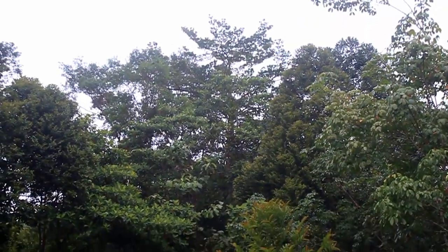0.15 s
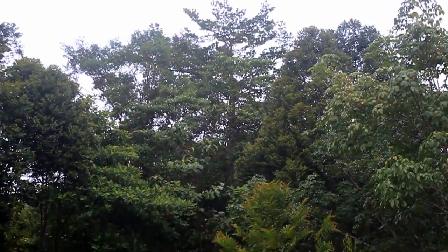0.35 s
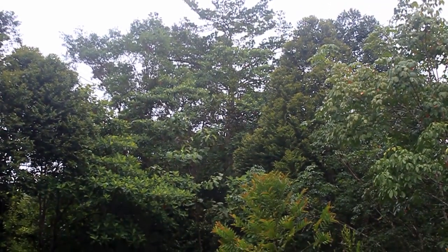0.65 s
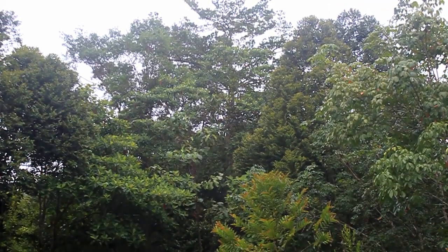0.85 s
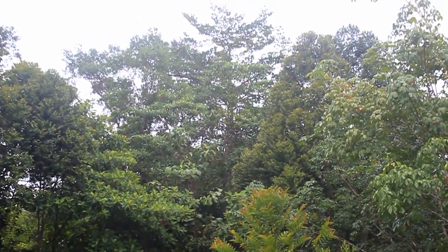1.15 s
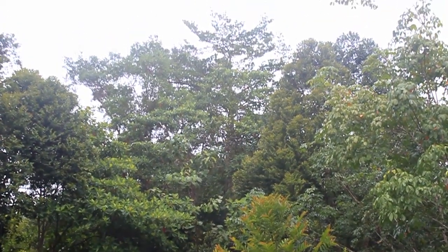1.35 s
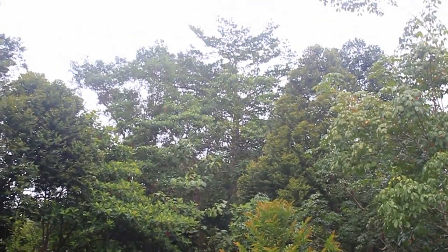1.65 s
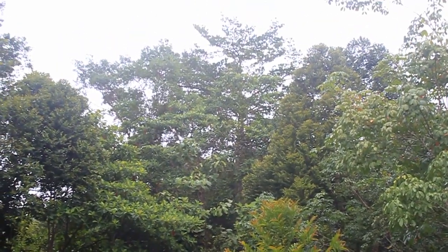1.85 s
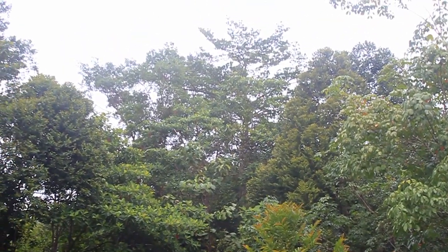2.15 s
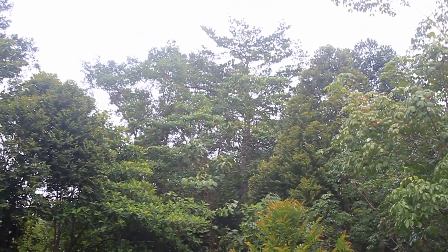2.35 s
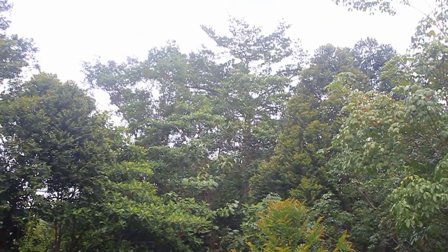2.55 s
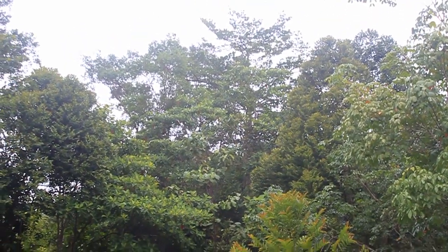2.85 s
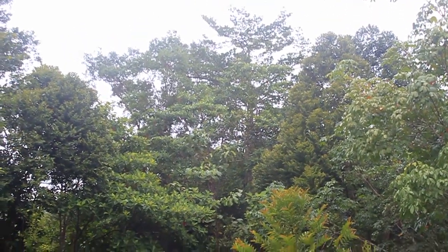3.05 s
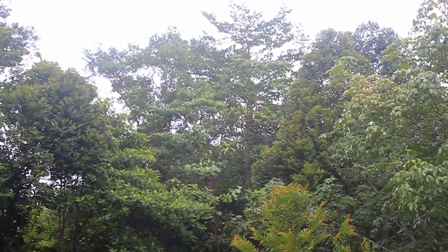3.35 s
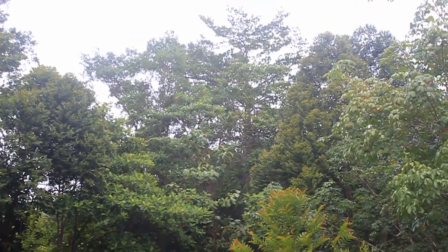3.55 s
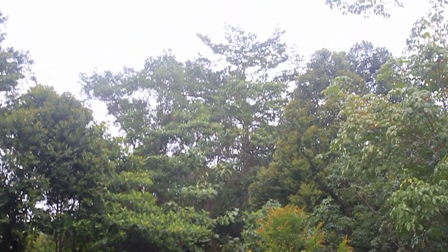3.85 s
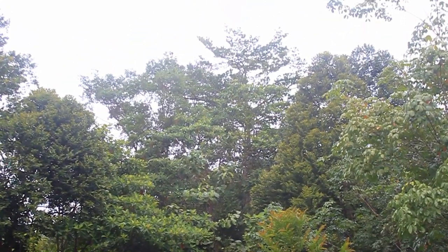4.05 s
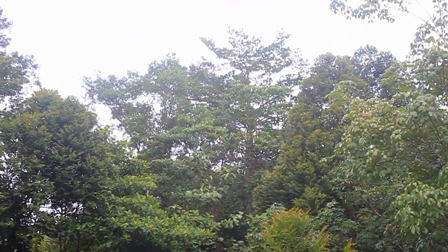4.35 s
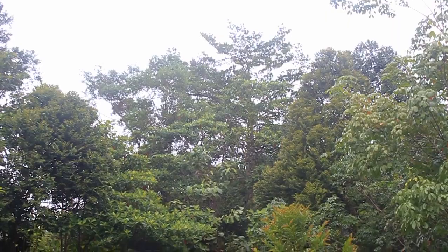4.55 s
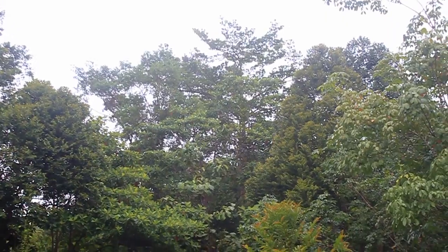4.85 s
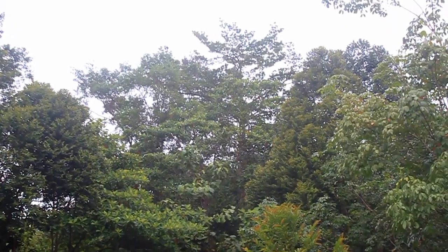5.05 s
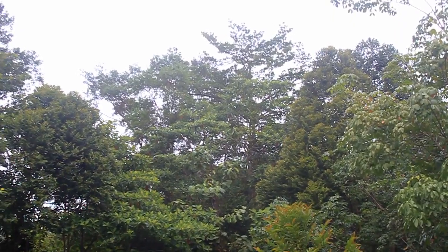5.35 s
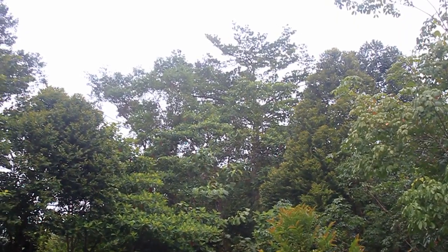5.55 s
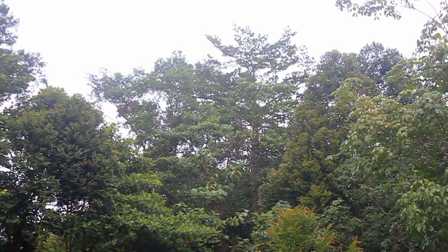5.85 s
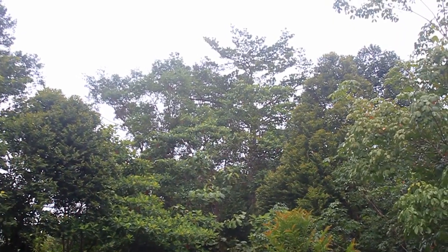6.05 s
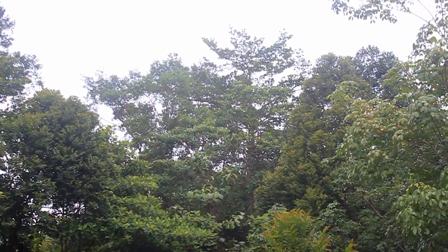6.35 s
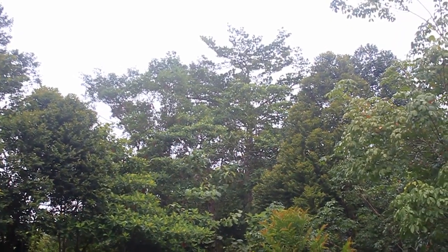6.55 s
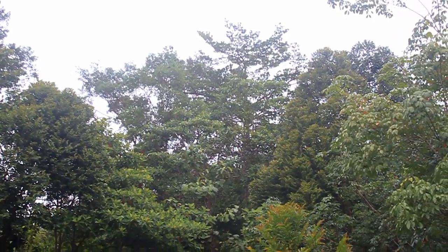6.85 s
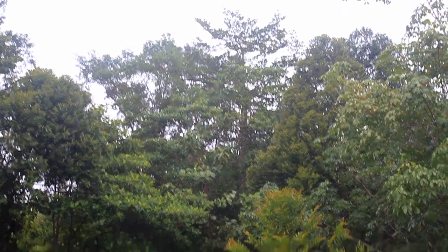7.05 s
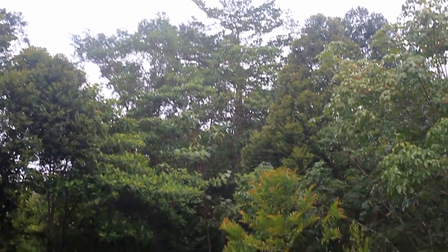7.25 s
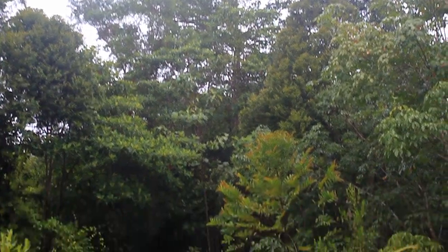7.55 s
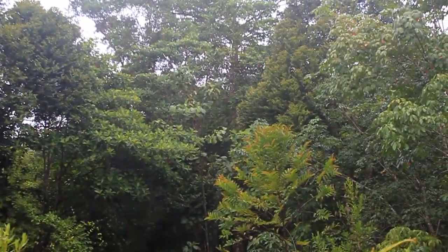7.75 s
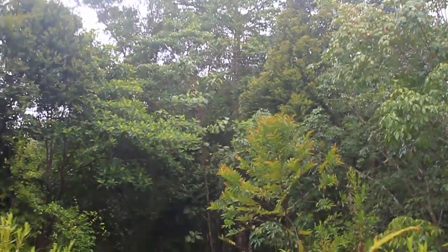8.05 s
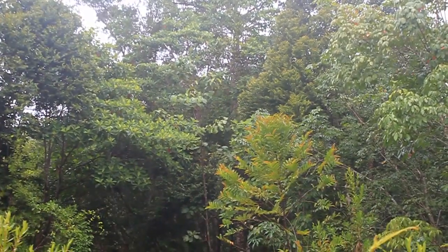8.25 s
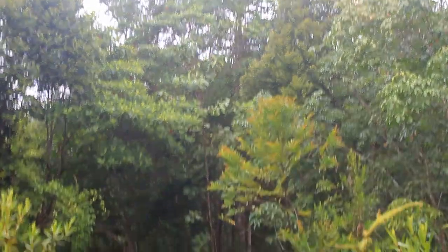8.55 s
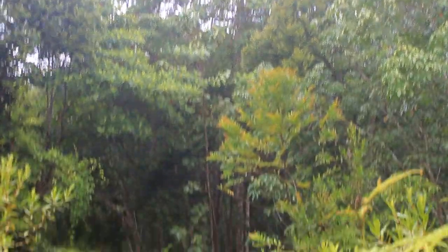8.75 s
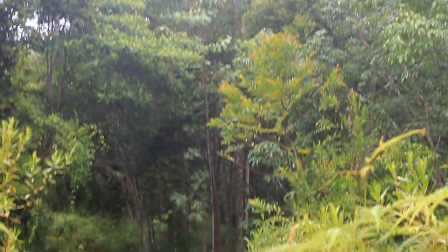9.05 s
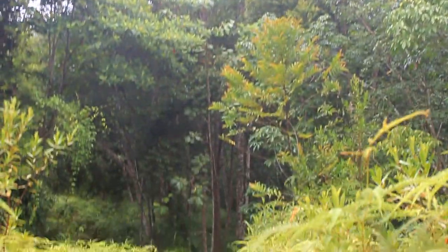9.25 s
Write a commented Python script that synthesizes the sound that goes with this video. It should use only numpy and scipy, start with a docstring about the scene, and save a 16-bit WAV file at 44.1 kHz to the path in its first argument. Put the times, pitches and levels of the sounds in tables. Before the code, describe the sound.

A rainforest hisses softly with distant leaves, while a cicada throbs, bush crickets trill in high swells and far insects drone throughout. Distant gibbons are much the loudest sound: clear hoots that slide quickly upward, hold, and trail off in a long forest echo. Overlapping whoops come in the first second, again from about 2.4 to 3.4 seconds and from 5.9 to 6.5 seconds, with a single last one at 9.4. A quieter bird whistles two thin, sagging notes from 1.6 to 2.7 seconds and repeats them from 8.5 seconds to the end. Another bird chirps faintly around 4 and 9 seconds. The cicada drops away briefly near 1.4 seconds, then builds back. Close to the microphone, soft woody taps and tiny bright ticks are scattered through, with one small, sharp knock at about 2.1 seconds.

```python
"""Gibbons in a rainforest.

Distant gibbons whoop in overlapping notes; trunks and leaves scatter each into a long tail.
One bird whistles two sagging notes, twice; another chirps faintly. A cicada's tymbals throb,
bush crickets trill above it, far insects drone and foliage hisses softly.
Close by: soft woody taps, and small ticks and one knock that ring a camera body."""
import sys
import numpy as np
from scipy import signal
from scipy.fft import rfft, irfft, next_fast_len
from scipy.io import wavfile

SR = 44100
rng = np.random.default_rng(int(sys.argv[2]) if len(sys.argv) > 2 else 0)


def waveform_to_disk(signal):
    """Save audio, clipped to [-1, 1], as 16-bit WAV at the path in sys.argv[1]."""
    frames = np.transpose(np.atleast_2d(signal))
    scaled = np.clip(frames, -1, 1) * 32767
    samples = np.round(scaled).astype(np.int16)
    wavfile.write(sys.argv[1], SR, samples)


N = 414981
TIME = np.arange(N) / SR

# forest echo decay: freq_hz, t60_s
ECHO_DECAY = [(400, 2.14), (770, 2.18), (1150, 1.69), (2300, 1.28), (4000, 1.08), (9000, 1.2)]
# far foliage spectrum: freq_hz, gain_db
FOLIAGE_SPECTRUM = [(20, -23), (50, -8), (100, -3), (160, 4), (220, 1.5), (450, 2.5), (1000, 4),
                    (2000, 3.5), (4000, 0.5), (6000, -4), (9000, -5.5), (11500, -8), (16000, -5)]
# far insect choruses: centre_hz, width_hz, level_db
CHORUS_BANDS = [(5530, 620, -65.5), (6570, 570, -69), (7330, 1300, -67)]
# thin insect buzz: peak_s, half_width_s, peak_db
BUZZ_SWELLS = [(.7, 1.9, -65), (2.8, 1.4, -63), (4.6, .9, -67.5), (6.45, 0.54, -62.5), (7.18, 0.093, -67),
               (8.08, .14, -67), (8.98, 0.19, -62), (9.35, .2, -70)]
# bush cricket bouts: start_s, length_s, peak_db, swell_db, release_s
CRICKET_BOUTS = [(0, .89, -56.5, 17, .05), (.95, .69, -64, 1.5, .06), (2.048, 1.83, -56.5, 19, 0.11),
                 (3.992, .83, -58.5, 8, .4), (5.25, 0.75, -60, 9, .15), (6.008, 1.03, -57, 7.5, 0.016),
                 (7.3, 1.22, -59, 13, 0.045), (8.6, .85, -55.5, 13, .05)]
# bush cricket spectrum: freq_hz, gain_db
CRICKET_SPECTRUM = [(9000, -20), (11700, -4), (12400, -2), (13500, 1), (15300, 5), (16500, -5.5)]
# cicada rhythm: time_s, throbs_completed
CICADA_THROBS = [(0, .15), (.79, 5), (2.41, 16), (2.935, 20), (3.505, 24), (4.378, 30), (5.727, 39),
                 (9.537, 64)]
# cicada effort: time_s, gain_db
CICADA_EFFORT = [(0, -59.5), (.72, -56.5), (.83, -69), (1.3, -64), (1.42, -88), (2.2, -69.5), (2.7, -62.5),
                 (3.7, -56), (8.3, -54.5), (9.4, -52)]
# far bird chirps: start_s, centre_hz, gain_db
BIRD_CHIRPS = [(3.884, 2792, -54), (3.97, 2040, -53), (4.076, 2095, -56), (4.196, 3540, -57),
               (4.316, 2480, -56), (9.089, 2540, -55), (9.2, 2670, -50), (9.271, 2800, -51)]
# bird whistles: start_s, length_s, low_hz, gain_db
BIRD_WHISTLES = [(1.614, 0.53, 3440, -46), (2.284, 0.46, 3768, -46.5), (8.457, .535, 3445, -48),
                 (9.099, 0.69, 3722, -47.5)]
# woody taps: start_s, gain_db, pitch_hz
WOODY_TAPS = [(1.476, -55, 1000), (2.11, -45, 1235), (4.013, -44, 978), (4.586, -49, 816),
              (4.643, -46.5, 1330), (4.686, -47, 1170), (4.934, -52, 1280), (7.359, -45.5, 1305),
              (7.481, -48, 1000), (8.515, -45, 1310), (8.972, -47, 970)]
# clearest camera ticks: start_s, gain_db
CLEAR_TICKS = [(1.7574, -47), (1.8966, -44), (2.1675, -45), (2.2773, -42), (3.8364, -40), (4.6404, -41),
               (4.9321, -42), (5.675, -43), (6.0654, -43.5), (6.5011, -41.5), (6.8543, -46), (7.0584, -47)]
# tick modes: freq_hz, gain_db, t60_s
TICK_RING = [(5070, -2, 0.023), (7150, 4, 0.0062), (9800, 8, 0.0031), (10440, -5.5, 0.016),
             (13200, -29, 0.0037)]
# camera body modes: freq_hz, gain_db, t60_s
BODY_RING = [(930, 8.5, 0.04), (1300, -19.5, .02), (1770, 3.5, 0.0078)]
# gibbon notes: mid_glide_s, glide_s, after_mid_s, from_hz, held_hz, bend_hz, bend_s, release_s,
# gain_db, octave_gain_db, upper_gain_db, echo_gain_db
GIBBON_NOTES = [ (0.054, .0235, 0.43, 440, 1148, -450, .25, 0.43, -23.5, -13.5, -41, -4.5),
                (0.54, .021, 0.16, 338.4, 1134, -200, 0.1, 0.071, -30, -34, -34.5, 0),
                (0.649, 0.0083, 0.044, 988, 1354, 0, .027, 0.014, -33.5, -19, -38, -5.5),
                (2.405, .016, .25, 500, 1027, 130, 0.087, 0.069, -17, -15, -39, -10),
                (2.699, 0.0033, .324, 1466, 1204, -380, .15, 0.13, -30, -7.5, -36, -3),
                (2.988, 0.022, 0.34, 420.4, 767.6, 15, 0.079, 0.23, -23.5, -21.5, -35, -5.5),
                (3.069, .0137, .338, 420, 1126, 336.5, 0.26, 0.045, -36.5, -21.5, -31, -6),
                (5.934, 0.015, 0.2225, 469.4, 955.4, 57, .17, 0.064, -15.5, -16.5, -36.5, -10.5),
                (6.177, 0.003, 0.23, 1373, 1154, -190, 0.11, 0.073, -26, -13, -36.5, -5.5),
                (6.353, 0.021, 0.13, 248.3, 1090, -13, 0.034, 0.12, -25, -24.5, -29, -4.5),
                (9.397, 0.012, 0.17, 480, 1020, 7, .05, .05, -17, -13.5, -38, -7)]
# throat response on harmonic 2: freq_hz, gain_db
THROAT_OCTAVE = [(1000, -1.5), (1500, -12.5), (1900, -3), (2430, -3), (2750, 7.5), (3000, -2)]
# throat response on harmonics 3-5: freq_hz, gain_db
THROAT_UPPER = [(2800, -1.5), (3400, 1), (3850, 1.5), (4450, 2.5), (5000, -6), (6000, -9)]


def amp(db):
    """Decibels to gain."""
    return 10 ** (np.asarray(db) / 20)


def unit(x):
    """Scale to unit rms."""
    return x / np.sqrt(np.mean(x ** 2) + 1e-20)


def curve(rows):
    """Straight lines through (time_s, value) rows."""
    return np.interp(TIME, *np.transpose(rows))


def read(rows, hz):
    """Interpolate (freq_hz, value) rows in log frequency."""
    freq_hz, value = np.transpose(rows)
    return np.interp(np.log(hz + 1), np.log(freq_hz + 1), value)


def add(mix, start_s, sound):
    """Mix a sound in at start_s."""
    part = mix[max(round(start_s * SR), 0):][:len(sound)]
    part += sound[:len(part)]


def noise(gain):
    """Unit-rms noise shaped by gain(hz)."""
    size = next_fast_len(N, True)
    spectrum = rfft(rng.standard_normal(size)) * gain(np.fft.rfftfreq(size, 1 / SR))
    return unit(irfft(spectrum, size)[:N])


def band(centre_hz, width_hz):
    """Noise in one resonance."""
    return noise(lambda hz: 1 / (1 + (2 * (hz - centre_hz) / width_hz) ** 2))


def drift(rate_hz):
    """Smooth random motion, mostly below rate_hz."""
    return noise(lambda hz: np.exp(-(hz / rate_hz) ** 2))


def phase_of(t, hz, waver):
    """Running phase of a wavering pitch."""
    return 2 * np.pi * np.cumsum(hz * (1 + np.interp(t, TIME, waver))) / SR


def ring(modes):
    """Damped sines of a struck object."""
    t = np.arange(SR // 10) / SR
    return sum(amp(db - 60 * t / t60_s) * np.sin(2 * np.pi * hz * t) for hz, db, t60_s in modes)


def forest(x, near_db=5, near_s=0.16):
    """Scatter off trunks and leaves: strong near echoes, then a long tail."""
    hz, t, spectra = signal.stft(rng.standard_normal(2 * SR), SR, nperseg=256)
    decay_db = -60 * t / read(ECHO_DECAY, hz)[:, None] + near_db * np.exp(-t / near_s)
    envelope = amp(decay_db) * (1 - np.exp(-t / 0.0065))
    envelope /= np.sqrt(np.mean(envelope ** 2, axis=1, keepdims=True) * 2 * SR)
    response = signal.istft(spectra * envelope, SR, nperseg=256)[1]
    return signal.fftconvolve(x, response)[:N]


def ground(x, dip_hz=835, width_hz=75, depth=0.88):
    """A reflection cancels one narrow band; glides hiccup as they cross it."""
    b, a = signal.iirpeak(dip_hz, dip_hz / width_hz, fs=SR)
    return x - depth * signal.lfilter(b, a, x)


def foliage(level_db=-54.5, drift_db=0.08):
    """Soft, near-steady wash of far leaves."""
    return amp(level_db - drift_db * drift(3.3)) * noise(lambda hz: amp(read(FOLIAGE_SPECTRUM, hz)))


def far_insects(flutter_db=0.87):
    """Far choruses merge into droning noise bands."""
    return sum(amp(db + flutter_db * drift(8)) * band(hz, width_hz) for hz, width_hz, db in CHORUS_BANDS)


def thin_buzz(centre_hz=12620, width_hz=850):
    """High insect buzz: one noise band that swells and fades."""
    swells = [amp(db) * np.exp(-((TIME - peak_s) / span_s) ** 2) for peak_s, span_s, db in BUZZ_SWELLS]
    return np.linalg.norm(swells, axis=0) * band(centre_hz, width_hz)


def bout(start_s, length_s, peak_db, swell_db, release_s, attack_s=0.03, swell_power=2.3):
    """Cricket effort in one bout: quick start, swell that levels off, release."""
    t = TIME - start_s
    attack = np.clip(t / attack_s + 1, 0, 1)
    swell = amp(peak_db - swell_db * np.clip(1 - t / length_s, 0, 1) ** swell_power)
    return swell * attack * np.exp(-np.maximum(t - length_s, 0) / release_s)


def bush_crickets(trill_hz=31.7, trill_db=3, floor_hz=8000):
    """High rasp; its trill deepens with effort."""
    effort = np.max([bout(*row) for row in CRICKET_BOUTS], axis=0)
    pulse = np.sin(phase_of(TIME, trill_hz, 0.02 * drift(3)))
    trill = amp(trill_db * effort / effort.max() * pulse)
    rasp = noise(lambda hz: amp(read(CRICKET_SPECTRUM, hz)) * (hz > floor_hz))
    return effort * unit(trill * rasp)


def cicada(click_hz=114.6, strong_hz=8690, weak_hz=8850, weak_db=-3, ring_s=0.00062,
           gap_db=-20, spread_db=2.8, blur_s=0.039, gain_db=-5.5):
    """Two tymbals click in turn, in about seven throbs a second; nearby leaves blur the clicks."""
    beats = np.floor(2 * np.cumsum(click_hz * (1 + 0.02 * drift(13))) / SR)
    throb_db = gap_db * np.cos(np.pi * curve(CICADA_THROBS)) ** 10  # long throbs, short pauses
    clicks = np.diff(beats, prepend=0) * amp(throb_db + spread_db * rng.standard_normal(N))
    t = np.arange(SR // 10) / SR
    envelope = t * np.exp(-t / ring_s)
    strong = signal.oaconvolve(clicks * (1 - beats % 2), envelope * np.sin(2 * np.pi * strong_hz * t))
    weak = signal.oaconvolve(clicks * (beats % 2), envelope * np.sin(2 * np.pi * weak_hz * t))
    buzz = unit((strong + amp(weak_db) * weak)[:N]) * amp(curve(CICADA_EFFORT))
    leaves = rng.standard_normal(len(t)) * np.exp(-t / blur_s)
    blurred = signal.oaconvolve(buzz, leaves / np.linalg.norm(leaves))[:N]
    return amp(gain_db) * (buzz + blurred)


def chirping_bird(length_s=0.0352, rise=0.2, gain_db=-1):
    """Far upward chirps, blurred by foliage."""
    song, t = np.zeros(N), np.arange(0, length_s, 1 / SR)
    for start_s, centre_hz, db in BIRD_CHIRPS:
        hz = centre_hz * (1 + rise * (t / length_s - 0.5))
        add(song, start_s, amp(db) * np.hanning(len(t)) * np.sin(2 * np.pi * np.cumsum(hz) / SR))
    return amp(gain_db) * (song + forest(song, near_db=17, near_s=0.049))


def whistling_bird(dive_hz=662, dive_s=0.041, flick_hz=880, flick_s=0.034, edge_s=0.019,
                   jitter=0.0028, direct_db=-6, echo_db=1):
    """Pure whistles from deep foliage; each sags, then flicks up."""
    song, waver = np.zeros(N), jitter * drift(39)
    for start_s, length_s, low_hz, db in BIRD_WHISTLES:
        t = np.arange(0, length_s, 1 / SR)
        hz = low_hz + dive_hz * np.exp(-t / dive_s) + flick_hz * np.exp((t - length_s) / flick_s)
        level = np.sqrt(2) * amp(db) * np.minimum(np.minimum(t, length_s - t) / edge_s, 1)
        add(song, start_s, level * np.sin(phase_of(start_s + t, hz, waver)))
    return amp(direct_db) * song + amp(echo_db) * forest(song, near_db=1.5, near_s=0.42)


def taps(t60_s=0.039, snap_db=-2, snap_s=0.0031, echo_db=-12):
    """Woody taps, like drops on leaves: a dull snap plus three damped modes."""
    out, t = np.zeros(N), np.arange(SR // 10) / SR
    hiss = band(centre_hz=1700, width_hz=3200)[:len(WOODY_TAPS) * len(t)]
    snaps = hiss.reshape(-1, len(t)) * np.exp(-t / snap_s)
    for (start_s, db, hz), snap in zip(WOODY_TAPS, snaps):
        modes = [(hz, 0, t60_s), (2.1 * hz, -7, t60_s), (2.7 * hz, -6, t60_s / 2)]
        add(out, start_s, amp(db) * (amp(snap_db) * snap + ring(modes)))
    return out + amp(echo_db) * forest(out)


def camera_ticks(gain_db=-5, body_db=-14, faint_count=8, faint_db=-47, spread_db=4):
    """Tiny bright ticks ring the camera body; extra faint ones fall at random."""
    out, tick = np.zeros(N), ring(TICK_RING) + amp(body_db) * ring(BODY_RING)
    faint = [(when * N / SR, faint_db + spread_db * (2 * strength - 1))
             for when, strength in rng.random((faint_count, 2))]
    for start_s, db in list(CLEAR_TICKS) + faint:
        add(out, start_s, amp(db + gain_db) * tick)
    return out


def camera_knock(start_s=2.1275, crack_db=-29, crack_s=0.0011, band_hz=(700, 9000), body_db=-43.5):
    """One sharp crack rings the camera body."""
    out, body = np.zeros(N), ring(BODY_RING)
    t = np.arange(len(body)) / SR
    burst = rng.standard_normal(len(t)) * np.exp(-t / crack_s)
    crack = signal.sosfilt(signal.butter(2, band_hz, "band", fs=SR, output="sos"), burst)
    add(out, start_s, amp(crack_db) * crack + amp(body_db) * body)
    return out


def whoop(mid_s, glide_s, after_mid_s, from_hz, held_hz, bend_hz, bend_s, release_s, gain_db,
          lead_glides=3.3, attack_power=1.56, weak_below_hz=608, crescendo_db=3.5, crescendo_s=0.026,
          release_db=-17, cutoff_s=0.0069):
    """One note's times, pitch, level: an S-glide to a held pitch that bends as breath runs out."""
    start_s, end_s = mid_s - lead_glides * glide_s, mid_s + after_mid_s
    t = np.arange(max(start_s, 0), end_s, 1 / SR)
    glide = 1 / (1 + np.exp((mid_s - t) / glide_s))
    bend, release = (np.maximum(1 - (end_s - t) / span_s, 0) ** 2 for span_s in (bend_s, release_s))
    hz = from_hz + (held_hz - from_hz) * glide + bend_hz * bend
    fullness = 1 / (1 + (weak_below_hz / hz) ** 6.2)
    attack = np.minimum((t - start_s) / (mid_s - start_s), 1) ** attack_power
    cutoff = np.minimum((end_s - t) / cutoff_s, 1)
    held_back_db = crescendo_db * np.exp(-np.maximum(t - mid_s, 0) / crescendo_s)
    level = np.sqrt(2) * amp(gain_db - held_back_db + release_db * release)
    return t, hz, level * fullness * attack * cutoff


def gibbons(jitter=0.005, bright_hz=930, octave_bloom_s=0.026, upper_bloom_s=0.082,
            overtone_direct_db=-2, overtone_echo_db=4):
    """Near-pure hoots; weak overtones open late and scatter off leaves more than the fundamental."""
    direct, scattered, waver = np.zeros(N), np.zeros(N), jitter * drift(27)
    for *shape, octave_db, upper_db, echo_db in GIBBON_NOTES:
        t, hz, level = whoop(*shape)
        phase, age_s = phase_of(t, hz, waver), t - t[0]
        brightness = 1 / (1 + (bright_hz / hz) ** 20)
        octave_bloom = 1 - np.exp(-(age_s / octave_bloom_s) ** 2)
        upper_bloom = brightness * (1 - np.exp(-(age_s / upper_bloom_s) ** 2))
        octave = octave_bloom * amp(read(THROAT_OCTAVE, 2 * hz)) * np.sin(2 * phase)
        upper = upper_bloom * sum(amp(read(THROAT_UPPER, k * hz)) * np.sin(k * phase) for k in (3, 4, 5))
        hoot = level * np.sin(phase)
        overtones = level * (amp(octave_db) * octave + amp(upper_db) * upper)
        add(direct, t[0], hoot + amp(overtone_direct_db) * overtones)
        add(scattered, t[0], amp(echo_db) * (hoot + amp(overtone_echo_db) * overtones))
    return ground(direct) + forest(scattered)


def scene(low_cut_hz=250):
    """Mono mix; bass cut on the small impacts only."""
    low_cut = signal.butter(2, low_cut_hz, "high", fs=SR, output="sos")
    impacts = signal.sosfilt(low_cut, camera_ticks() + camera_knock() + taps())
    calls = gibbons() + whistling_bird() + chirping_bird()
    insects = cicada() + bush_crickets() + thin_buzz() + far_insects()
    return (foliage() + insects + impacts + calls)[None]


def record(dry, edge_hz=15750):
    """Steep low-pass band limit."""
    low_pass = signal.firwin(511, edge_hz, window=("kaiser", 9), fs=SR)
    return signal.oaconvolve(dry, low_pass[None], "same")


dry = scene()
out = record(dry)
waveform_to_disk(out)
```